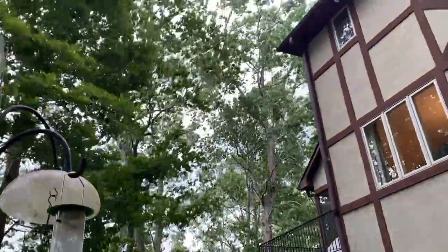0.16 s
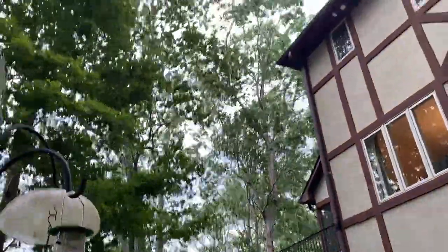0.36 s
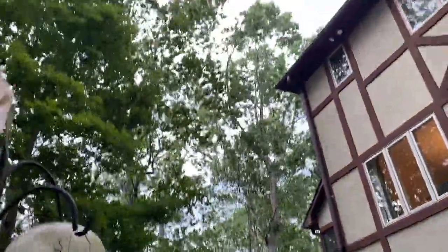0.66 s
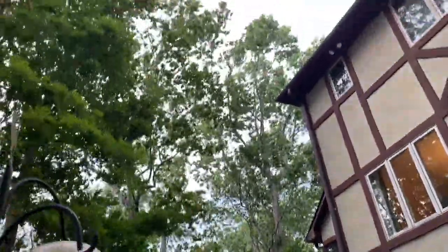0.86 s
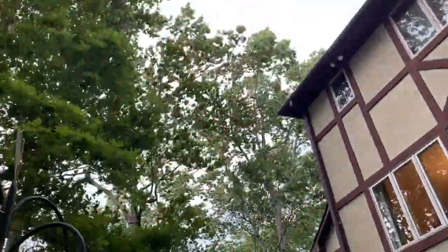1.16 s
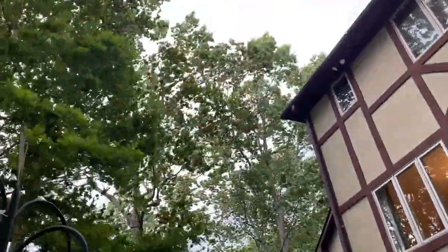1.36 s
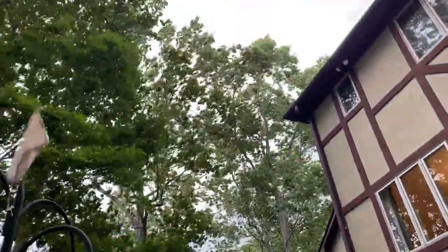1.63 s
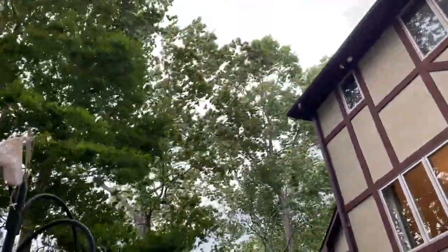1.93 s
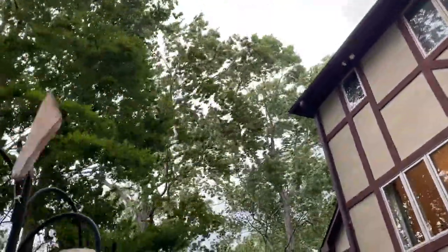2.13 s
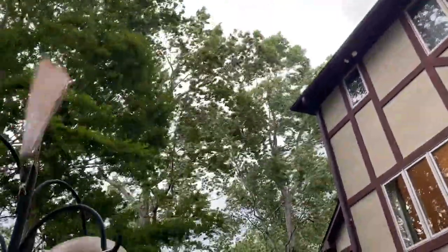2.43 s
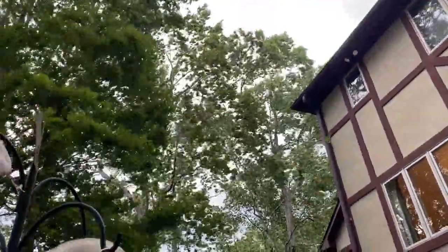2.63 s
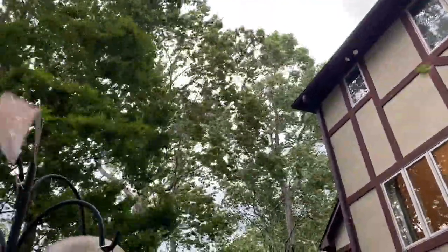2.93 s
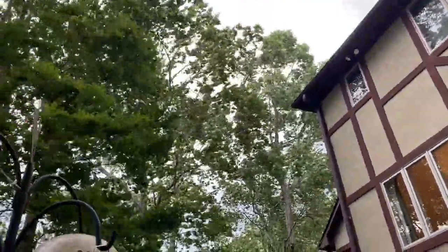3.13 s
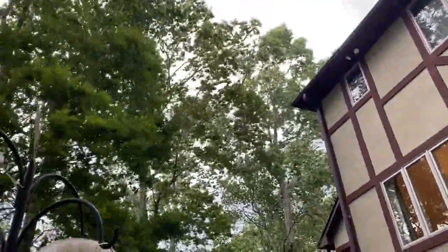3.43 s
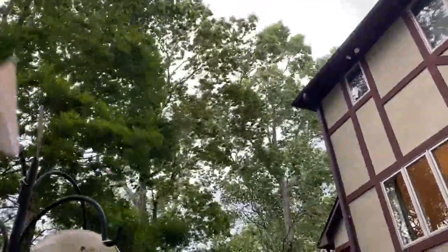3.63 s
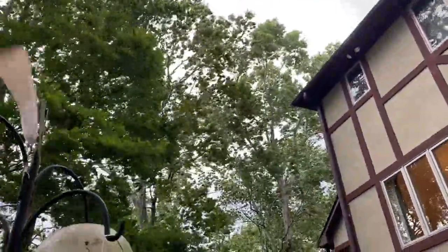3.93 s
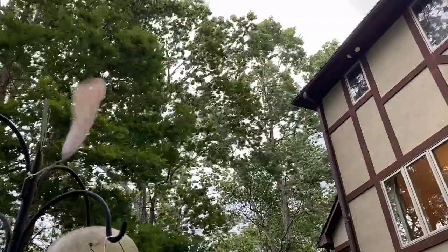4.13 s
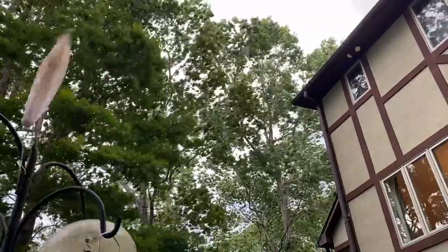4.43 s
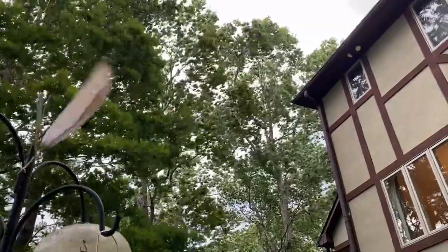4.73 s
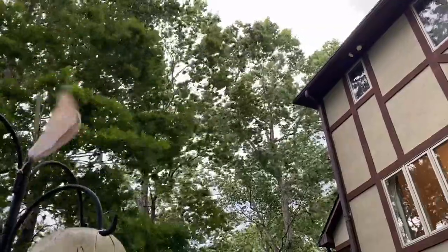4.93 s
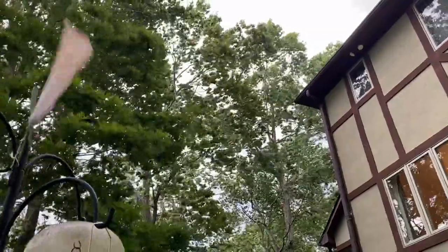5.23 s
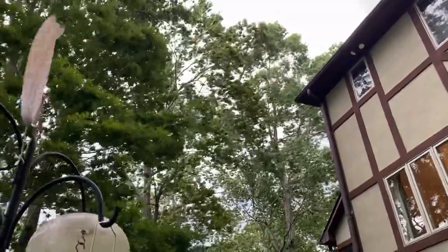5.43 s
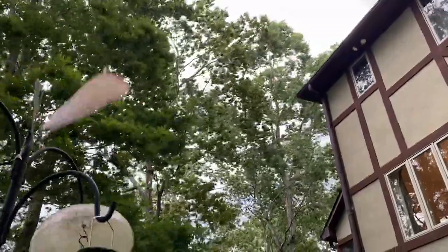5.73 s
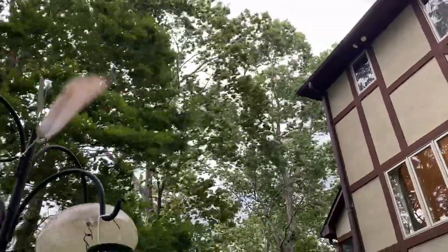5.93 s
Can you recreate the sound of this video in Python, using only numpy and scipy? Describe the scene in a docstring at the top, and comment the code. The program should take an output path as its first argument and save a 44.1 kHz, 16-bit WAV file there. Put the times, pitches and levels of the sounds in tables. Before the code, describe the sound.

Outdoors beside a house, gusty wind hits a hand-held stereo microphone directly. Light thumps and flutters come first over a smooth leaf hiss; after about a second the blows become heavy, deep and nearly continuous, with brief roaring puffs, dry pops and tiny crackles. Tall trees keep rushing behind, slowly louder, and the buffeting stays strong until easing at the very end.

```python
"""Strong gusts buffet a hand-held two-port microphone and thrash tall trees beside a house.
Trains of pressure jolts from four eddy sizes make the rumble and flutter; puffs of roar are denser jolts.
Blows of air thud, small eddies pop in short flicks, rough noise crackles, and leaves are a smooth shaped hiss.
The recorder's low cut smears each blow into a falling thump, and the bass soon narrows to mono."""
import sys
import numpy as np
from scipy import signal
from scipy.fft import rfft, irfft, next_fast_len
from scipy.io import wavfile
from scipy.ndimage import uniform_filter1d

SR = 44100
rng = np.random.default_rng(int(sys.argv[2]) if len(sys.argv) > 2 else 0)


def bounce(signal):
    """Save signal as a 16-bit WAV file at the path given by the first command-line argument."""
    frames = np.transpose(np.atleast_2d(signal))
    limited = np.clip(frames, -1, 1)
    pcm = np.round(limited * 32767).astype(np.int16)
    wavfile.write(sys.argv[1], SR, pcm)


N = 268083

# Slow swell of the leaf hiss. Each row: time in seconds, level in dB.
LEAF_SWELL = [(0, -28), (.3, -27), (1., -25.5), (2.3, -24.5), (5.5, -24), (6.08, -23)]
# Extra body in the middle of the hiss. Each row: time in seconds, gain in dB.
LEAF_BODY = [(0, 3.5), (4.4, 0.83), (5., 2.7), (6.08, 3.2)]
LEAF_BODY_HZ, LEAF_BODY_OCTAVES = 1580, 0.57
# Tone colour of the leaves. Each row: frequency in Hz, relative density in dB per Hz.
LEAF_SPECTRUM = [(30, -30), (80, 9.5), (300, 3.5), (600, -3), (1200, -2), (2200, -3.5), (3000, -4.5),
                 (5200, -6), (6200, -8.5), (9000, -13), (12000, -14.5), (14300, -20.5), (15700, -24.5)]

# How alike the two ports sound. Each row: frequency in Hz, likeness from 0 to 1.
PORT_LIKENESS = [(60, .82), (200, .65), (430, .6), (600, .5), (1000, .35), (1900, .03), (2400, .33),
                 (4200, .68), (5350, .28), (6900, .88), (8000, .94), (16000, .94)]
# Phase between the ports. Each row: frequency in Hz, lead of the right port's shared part in radians.
PORT_LEAD = [(0, 0.0), (250, 0.03), (700, 1.35), (1000, 1.15), (1450, 3.0), (2100, 6.23), (3000, 5.61),
             (4000, 6.06), (5000, 6.04), (5650, 6.59), (6400, 5.98), (7200, 6.47), (8900, 9.42),
             (11200, 12.57), (13300, 15.71), (15200, 18.85), (16000, 18.85)]
# Balance of the ports. Each row: frequency in Hz, left-over-right tilt in dB.
PORT_TILT = [(60, 0.0), (110, 0.0), (200, 0.0), (380, 0.0), (700, -0.5), (1290, -0.5), (2380, 0.5),
             (4400, 3.0), (8120, 1.0), (15000, 0.0)]

# Bright crackles. Each row: start in seconds, noise level before the envelope in dB.
CRACKLES = [(1.469, -20), (1.751, -21), (1.889, -21), (1.929, -21), (2.05, -18), (2.861, -18), (2.919, -22),
            (2.969, -14.5), (2.976, -19), (3.102, -20), (3.197, -19), (3.24, -19), (3.608, -21),
            (3.86, -23), (3.991, -20), (4.013, -19), (5.082, -21), (5.207, -22), (5.399, -21), (5.441, -18),
            (5.466, -19), (5.711, -18), (5.794, -20), (5.824, -20), (5.868, -18)]
CRACKLE_RISE_S, CRACKLE_FADE_S = 0.0008, 0.0035

# Sharp pops of small eddies. Each row: start in seconds, level in dB, left-port pitch in Hz.
POPS = [(0.218, -17.5, 656), (0.33, -19, 670), (0.634, -16, 650), (1.751, -18, 620), (1.855, -10, 680),
        (1.904, -3, 704), (1.966, -16, 620), (2.049, -6, 1080), (2.404, -8, 670), (2.839, -11, 680),
        (2.86, -6.5, 1110), (2.969, -13, 1100), (3.198, -9, 650), (3.273, -3, 680), (4.197, -14, 720),
        (4.409, -9, 820), (4.526, -13, 755), (4.72, -4.5, 615), (4.823, -6.5, 1190), (4.879, -6.5, 716),
        (4.923, -9, 1000), (5.057, -1.5, 840), (5.207, -10, 550), (5.242, -12, 670), (5.328, -11, 760),
        (5.563, -13, 960), (5.629, -4, 920)]

# Single blows of air. Each row: cue in seconds, push level in dB, half width in milliseconds.
THUMPS = [(0.052, -19, 0.88), (0.161, -6, 1), (0.335, -6.5, 1.1), (0.632, -0.5, 1), (0.7, -8.5, 1.7),
          (0.749, -5.5, 0.62), (0.994, -7, .8), (1.248, 2, 3.2), (1.328, -2.5, 2.5), (1.376, -6.5, 1.8),
          (1.454, -0.5, 1.4), (1.612, -6, 2.4), (1.676, -3, 0.91), (1.753, -3, 0.78), (1.794, 5.5, 1.44),
          (1.845, 0, 0.53), (1.894, -2, 0.71), (1.938, 2.5, 1.7), (2.014, -8, 0.94), (2.053, -0.5, 1.3),
          (2.245, -4.5, 0.82), (2.407, 3, 4.3), (2.418, 1, 0.69), (2.593, -12, 1.5), (2.709, -4, 1.7),
          (2.798, -8.5, 0.88), (2.855, 2.5, 0.69), (2.921, -6, 2.9), (2.975, -4, 1.6), (3.004, -4.5, 2.1),
          (3.058, -4, 1.2), (3.151, -8, 0.46), (3.193, -2.5, 1.1), (3.232, 0, 0.71), (3.27, 2.5, 0.71),
          (3.306, 1, 0.59), (3.336, -1, 0.62), (3.429, -6, 0.86), (3.623, -5, 2.6), (3.713, -5.5, 1.1),
          (3.759, -1, 3.1), (3.807, 7, 0.97), (3.885, -4.5, 1.4), (3.927, -0.5, 0.71), (3.986, -7, 2.8),
          (4.038, -1.5, 3.3), (4.077, -2, 0.94), (4.133, 2.5, 0.5), (4.164, -2, 1.6), (4.224, 0, 0.58),
          (4.416, -2, 0.74), (4.507, -3.5, 1.1), (4.536, 0, 0.88), (4.629, -5, 0.95), (4.715, 0, 0.7),
          (4.72, -5, 2.1), (4.882, -9, 2.4), (4.958, -10, .9), (4.993, -7, 1.1), (5.053, -3, 0.87),
          (5.079, -2, 0.43), (5.082, -3, 2.3), (5.117, -8, 0.7), (5.144, -8, 0.55), (5.206, -7, 0.52),
          (5.209, -2, 2.4), (5.332, -3.5, 3), (5.439, -3, 2.6), (5.491, -5, 2.8), (5.551, 1.5, 1.75),
          (5.654, -6, 3.2), (5.73, -10, .8), (5.796, -3, 2.1), (5.92, -5, 2.1)]
REBOUND = 0.16  # halved when applied

# Puffs of dense roar. Each row: start in seconds, length in seconds, level in dB, centre in Hz.
ROARS = [(0.053, 0.029, -26, 650), (0.101, .02, -32, 450), (0.138, .012, -35, 800),
         (0.215, 0.018, -24, 1000), (0.291, 0.014, -25.5, 500), (0.322, 0.029, -22.5, 796),
         (0.512, 0.046, -26, 490), (0.64, 0.074, -25.5, 630), (0.728, 0.063, -28, 497),
         (1.085, 0.051, -27, 700), (1.17, 0.043, -29, 600), (1.311, 0.039, -25, 600),
         (1.372, 0.013, -22, 600), (1.408, 0.039, -27, 800), (1.466, 0.027, -25, 800),
         (1.745, 0.014, -21, 700), (1.844, 0.018, -20, 654), (1.892, 0.041, -18, 800),
         (1.926, 0.028, -17, 550), (1.96, 0.041, -24.5, 1100), (2.041, 0.035, -28, 950),
         (2.11, 0.0099, -23, 800), (2.239, 0.015, -23, 654), (2.399, 0.035, -31, 750),
         (2.469, 0.038, -25, 550), (2.592, .012, -20.5, 600), (2.668, 0.059, -26, 800),
         (2.781, 0.021, -28, 900), (2.838, 0.045, -21, 910), (2.943, 0.053, -25, 1480),
         (3.004, 0.033, -21, 900), (3.079, 0.034, -29, 1000), (3.15, 0.028, -25, 450),
         (3.193, 0.064, -22, 715), (3.27, 0.026, -19, 800), (3.301, 0.077, -20, 520),
         (3.501, 0.036, -30, 450), (3.601, .025, -26, 1200), (3.646, 0.038, -23, 890),
         (3.716, 0.027, -29, 450), (3.832, 0.07, -23.5, 790), (3.977, 0.058, -28, 900),
         (4.032, .012, -24, 700), (4.119, 0.07, -22.5, 735), (4.403, 0.022, -24.5, 800),
         (4.425, 0.045, -22, 330), (4.525, 0.04, -25, 690), (4.651, 0.026, -25, 790),
         (4.814, 0.077, -24, 1010), (4.914, 0.083, -23.5, 1060), (5.039, 0.054, -20.5, 804),
         (5.202, 0.015, -24, 500), (5.238, 0.059, -27, 980), (5.325, 0.052, -21, 920),
         (5.398, 0.014, -22, 800), (5.43, 0.12, -25, 1210), (5.499, 0.043, -25, 400),
         (5.549, 0.1, -21, 1020), (5.6, 0.052, -29, 420), (5.668, 0.044, -26, 1010),
         (5.903, 0.014, -24, 700), (5.975, .012, -27, 450)]
ROAR_OCTAVES, ROAR_EDGE_S, ROAR_CHURN_DB = 0.84, 0.002, 5
ROAR_GRAIN = 1.9  # only jolts above this many times the usual size are heard

# Gusts at the ports. Each row: start in seconds, length in seconds, strength in dB,
# brightness in dB (what small eddies gain over large ones).
GUSTS = [(0.052, 0.12, -25.5, -2.5), (0.202, 0.14, -29, -3), (0.45, 0.13, -29.5, 0), (0.628, 0.11, -29, -1),
         (0.915, 0.12, -30.5, 2), (1.059, 0.12, -25, 0), (1.218, 0.12, -22, -3), (1.409, 0.11, -20, -1),
         (1.572, 0.12, -25.5, 0), (1.757, 0.052, -22.5, 4), (1.868, 0.12, -21, 0.5),
         (2.012, 0.074, -21.5, -2), (2.214, 0.099, -29, -4), (2.4, 0.026, -17, -4.5),
         (2.474, 0.079, -24, -0.5), (2.6, 0.02, -21, -6), (2.668, 0.067, -19, -1.5), (2.792, 0.12, -21, -3),
         (2.918, 0.17, -20.5, -2.5), (3.15, 0.25, -20.5, -2.5), (3.491, 0.041, -21.5, 1),
         (3.589, 0.1, -23, -1), (3.714, 0.21, -22.5, -2), (3.977, 0.11, -21.5, -2.5),
         (4.118, 0.11, -22.5, 0.5), (4.328, 0.12, -24, 1), (4.516, 0.06, -20, -3.5),
         (4.64, 0.03, -21, -0.5), (4.723, 0.032, -20.5, -3), (4.813, 0.16, -21, -3),
         (4.98, 0.14, -24, -3.5), (5.206, 0.091, -23, -1.5), (5.317, 0.063, -21.5, -3),
         (5.42, 0.1, -24, -2), (5.547, 0.14, -19.5, -3.5), (5.718, 0.03, -24, -2.5),
         (5.785, 0.064, -24.5, -5), (5.885, 0.057, -24, -1.5), (5.97, 0.025, -26, -4), (6.03, .05, -29, -4)]
RISE_DB_PER_S, FALL_DB_PER_S = 507, 356
LULL_DB, LULL_BRIGHT_DB = -37.5, -4

# Eddy sizes. Each row: low edge in Hz, high edge in Hz, jolts per second, jolt size spread in dB,
# level in dB, share of the gust's brightness, head start in seconds, span of chance in seconds.
EDDIES = [(38, 103.7, 110, 3., 1.5, -1, 0.018, 0.12), (110, 515, 400, 3., 0, 0.35, 0.0019, 0.046),
          (438, 1100, 1500, 3., -4, 0.81, 0.0014, 0.069), (1270, 2040, 2100, -0.5, -16, 1, 0.001, 0.066)]
CLUMP_DB = 3.5

# The bass fades to mono below a moving corner. Each row: time in seconds, corner in Hz.
MONO_BELOW = [(0, 25), (1.25, 29.4), (1.45, 167), (2.1, 342), (4, 382), (6.1, 513)]
CEILING, EDGE_HZ = 0.93, 15750  # full scale is 1; top of the band


def gain_of(db):
    """Turn dB into an amplitude factor."""
    return 10 ** (np.asarray(db) / 20)


def evened(x):
    """Bring each row to an RMS of one."""
    return x / np.sqrt(np.mean(x ** 2, axis=-1, keepdims=True) + 1e-20)


def smoothed(x, first, second, axis=-1):
    """Two running averages, with lengths in samples."""
    return uniform_filter1d(uniform_filter1d(x, size=first, axis=axis), size=second, axis=axis)


def read(points, at):
    """Straight lines between table rows."""
    return np.interp(at, *np.transpose(points))


def read_log(points, hz):
    """Straight lines on a log-frequency axis."""
    f, value = np.transpose(points)
    return np.interp(np.log(hz + 1), np.log(f + 1), value)


def octave_bell(hz, centre_hz, octaves):
    """A bell around a centre, falling to 1/e at the given octaves either side."""
    return np.exp(-(np.log2((hz + 1) / centre_hz) / octaves) ** 2)


def add(mix, s, sound):
    """Lay a short stereo sound into the mix at s seconds."""
    start = round(s * SR)
    mix[:, start:start + sound.shape[1]] += sound[:, :N - start]


def ports(pair):
    """Two unrelated sounds become left and right: partly alike, turned in phase and tilted."""
    size = next_fast_len(N + SR)
    hz = np.fft.rfftfreq(size, 1 / SR)
    shared, other = rfft(pair, size)
    same = np.clip(read_log(PORT_LIKENESS, hz), 0, 1)
    tilt = gain_of(read_log(PORT_TILT, hz) / 2)
    turned = shared * np.exp(1j * read(PORT_LEAD, hz))
    right = (same * turned + np.sqrt(1 - same ** 2) * other) / tilt
    return irfft([shared * tilt, right], size)[:, :N]


def leaves():
    """Countless leaves merge into a patchy, swelling hiss whose middle thins, then fills out again late."""
    frames, hz = N // 256 + 5, np.fft.rfftfreq(1024, 1 / SR)
    re, im, patches = rng.standard_normal((3, 2, 513, frames))
    # faint patches spread over neighbouring frequencies and moments
    patches = uniform_filter1d(patches[0], size=12, axis=0)
    patches = evened(uniform_filter1d(patches, size=14, axis=1))
    flicker = evened(uniform_filter1d(rng.standard_normal(frames), size=4))
    body_db = read(LEAF_BODY, np.arange(frames) * 256 / SR)
    body = np.outer(octave_bell(hz, LEAF_BODY_HZ, LEAF_BODY_OCTAVES), body_db)
    colour_db = read_log(LEAF_SPECTRUM, hz)[:, None] + body + 0.82 * patches + 0.21 * flicker
    spectrum = (re + 1j * im) * gain_of(colour_db)
    hiss = signal.istft(spectrum, nperseg=1024, noverlap=768)[1][:, :N]
    return evened(hiss) * gain_of(read(LEAF_SWELL, np.arange(N) / SR))


def crackles():
    """A crackle is a few milliseconds of bright rough noise."""
    out, t = np.zeros((2, N)), np.arange(1200) / SR
    band = signal.butter(4, [900, 4700], "bandpass", fs=SR, output="sos")
    shape = np.exp(-t / CRACKLE_FADE_S) * (1 - np.exp(-t / CRACKLE_RISE_S))
    for (s, db), noise in zip(CRACKLES, rng.standard_normal((len(CRACKLES), 2, 1200))):
        leaked = noise + 0.23 * noise[::-1]  # each port shares a little of the other
        rough = evened(signal.sosfilt(band, leaked))
        add(out, s, gain_of(db) * rough * shape)
    return out


def pops():
    """A pop is a flick of two cycles or so, with its own pitch and phase at each port."""
    out, t = np.zeros((2, N)), np.arange(400) / SR
    for (s, db, hz), (turn, skew, detune) in zip(POPS, rng.random((len(POPS), 3))):
        pitch = hz * np.array([[1], [0.816 + 0.34 * detune]])
        phase = turn + np.array([[0], [0.42 * skew]])  # in cycles
        shape = (t * hz / 1.12 * np.exp(1 - t * hz / 1.065)) ** 1.8
        add(out, s, gain_of(db) * shape * np.sin(2 * np.pi * (pitch * t + phase)))
    return out


def thumps():
    """A blow is one smooth push of air with a wider rebound; it reaches one port just before the other."""
    out, t = np.zeros((2, N)), np.arange(-800, 800) / SR
    for (s, db, ms), first in zip(THUMPS, rng.choice([-1, 1], len(THUMPS))):
        offset = first * 0.0001 * np.array([[1], [-1]])  # seconds, opposite at the two ports
        arrival = (t + offset) * 1e3 / ms
        push = np.exp(-arrival ** 2) - REBOUND / 2 * np.exp(-(arrival / 2) ** 2)
        add(out, s - 0.0155, gain_of(db) * push)  # the push centres about 2.6 ms after its cue
    return out


def roars():
    """A puff is a dense patter of jolts around its centre that starts and stops quickly and churns as it goes."""
    out = np.zeros((2, N))
    t, hz = np.arange(8192) / SR, np.fft.rfftfreq(8192, 1 / SR)
    for (s, length, db, centre_hz), noise in zip(ROARS, rng.standard_normal((len(ROARS), 3, 8192))):
        jolts = noise[:2] * (abs(noise[:2]) > ROAR_GRAIN)
        patter = irfft(rfft(jolts) * octave_bell(hz, centre_hz, ROAR_OCTAVES))
        churn = evened(smoothed(noise[2], 200, 120))
        shape = np.clip(np.minimum(t, length + ROAR_EDGE_S - t) / ROAR_EDGE_S, 0, 1)
        add(out, s, evened(patter * gain_of(ROAR_CHURN_DB * churn)) * shape * gain_of(db))
    return ports(out)


def gusts(t, share):
    """A gust rises fast, holds and falls away; the powers of gusts add up over the lull."""
    power = np.full(len(t), gain_of(LULL_DB + share * LULL_BRIGHT_DB) ** 2)
    for start, length, db, bright_db in GUSTS:
        early = np.clip(start - t, 0, None)
        late = np.clip(t - start - length, 0, None)
        level_db = db + share * bright_db - RISE_DB_PER_S * early - FALL_DB_PER_S * late
        power = power + gain_of(level_db) ** 2
    return np.sqrt(power)


def buffeting():
    """Each eddy size is a train of uneven pressure jolts that comes in clumps under the gusts."""
    t, out = np.arange(N) / SR, np.zeros((2, N))
    clumps = evened(signal.lfilter([1], [1, -2 * .993, .993 ** 2], rng.standard_normal(N)))
    for lo_hz, hi_hz, per_s, spread_db, level_db, share, early, span in EDDIES:
        when, size, sign = rng.random((3, 2, N))
        sizes = gain_of(-spread_db * np.log(size + 0.0022))
        jolts = (when < per_s / SR) * sizes * np.sign(sign - .5)
        band = signal.butter(2, [lo_hz, hi_hz], "bandpass", fs=SR, output="sos")
        eddies = evened(signal.sosfilt(band, jolts * gain_of(CLUMP_DB * clumps)))
        # beyond its span the strength follows the gust, not chance
        power = smoothed(eddies ** 2, int(span * SR), int(span * SR / 2))
        levelled = evened(eddies / (abs(power) + 0.057) ** 0.72)
        coarse = np.arange(0, N / SR, .002)
        strength = np.interp(t, coarse, gusts(coarse + early, share))
        out += levelled * strength * gain_of(level_db)
    return ports(out)


def scene():
    """Wind at the microphone over the hiss of the leaves."""
    return ports(leaves()) + crackles() + pops() + thumps() + roars() + buffeting()


def record(dry, cut_hz=41.5, smear_hz=74.7, stages=8.05):
    """The low cut delays the bass behind the treble; the bass loses its width; peaks are rounded off; band limit."""
    hz = np.fft.rfftfreq(N, 1 / SR)
    smear = np.exp(-2j * stages * np.arctan(hz / smear_hz))
    low_cut = smear * hz ** 4 / np.hypot(hz ** 4, cut_hz ** 4)
    left, right = irfft(rfft(dry, N) * low_cut, N)[:, :N]
    mid = (left + right) / 2
    # take the width out of the bass
    hz, t, width = signal.stft((left - right) / 2, SR, nperseg=2048, noverlap=1536)
    width = width / np.sqrt(1 + (read(MONO_BELOW, t) / (hz[:, None] + 1)) ** 30)
    side = signal.istft(width, SR, nperseg=2048, noverlap=1536)[1][:N]
    pair = np.array([mid + side, mid - side])
    # the louder port sets the rounding of both
    pair = pair / (1 + (abs(pair).max(axis=0) / CEILING) ** 6) ** (1 / 6)
    edge = signal.firwin(511, EDGE_HZ, window=("kaiser", 9), fs=SR)
    return signal.oaconvolve(pair, edge[None], "same")


dry = scene()
out = record(dry)
bounce(out)
```